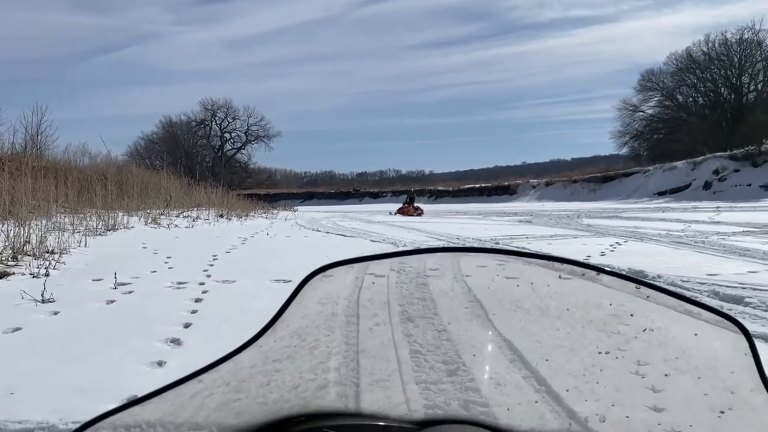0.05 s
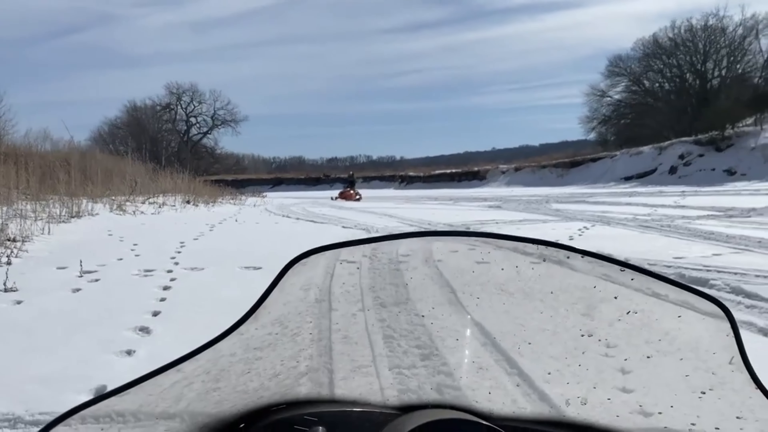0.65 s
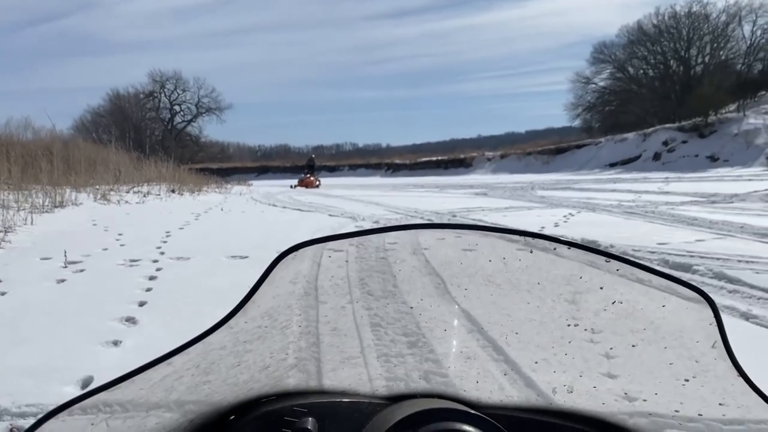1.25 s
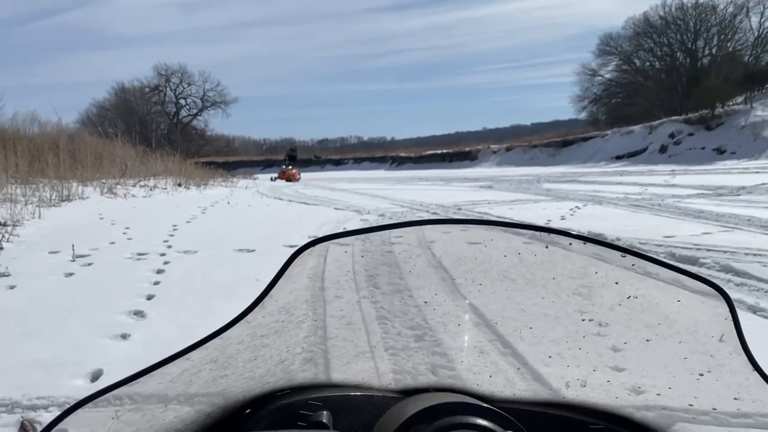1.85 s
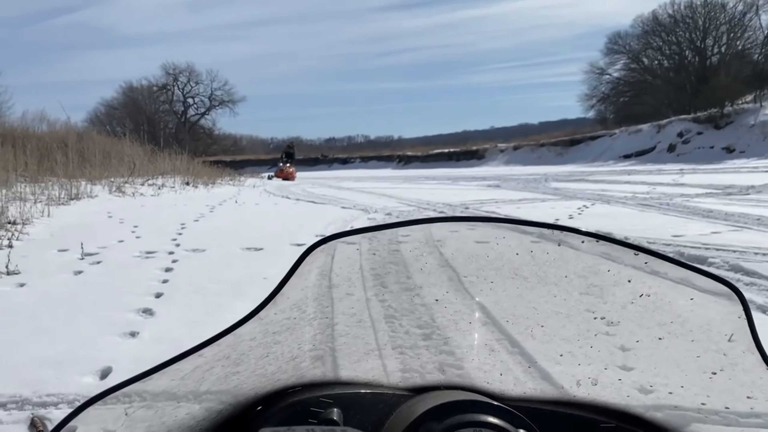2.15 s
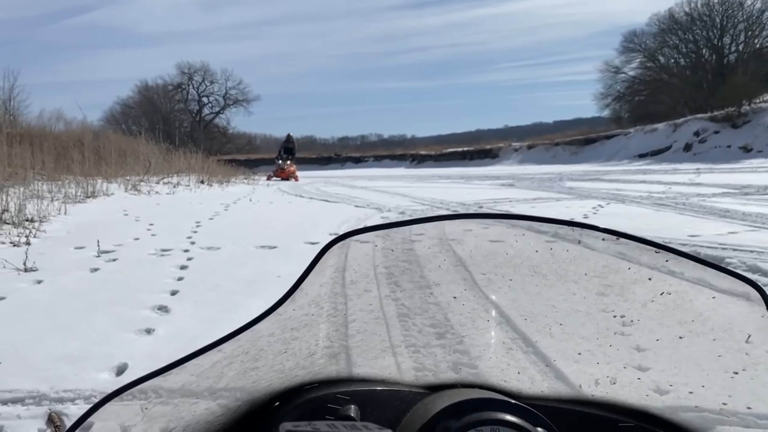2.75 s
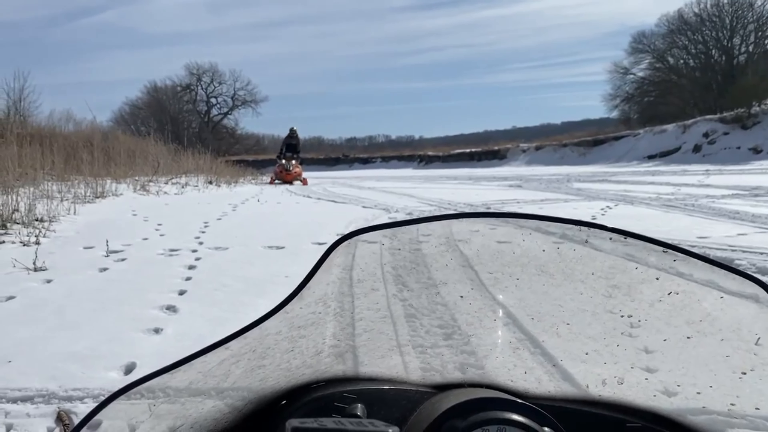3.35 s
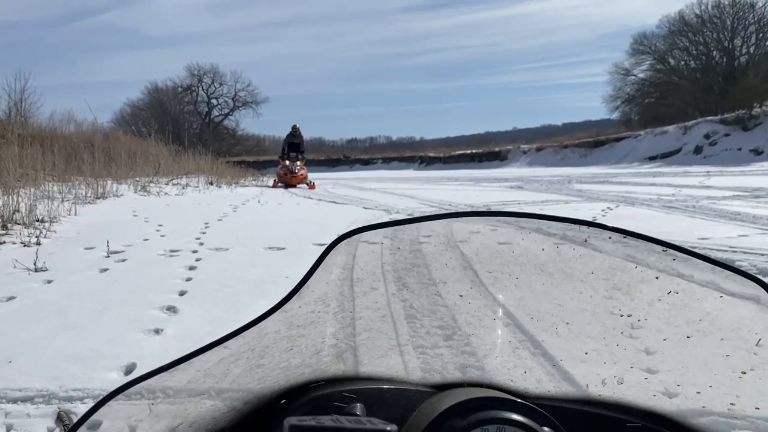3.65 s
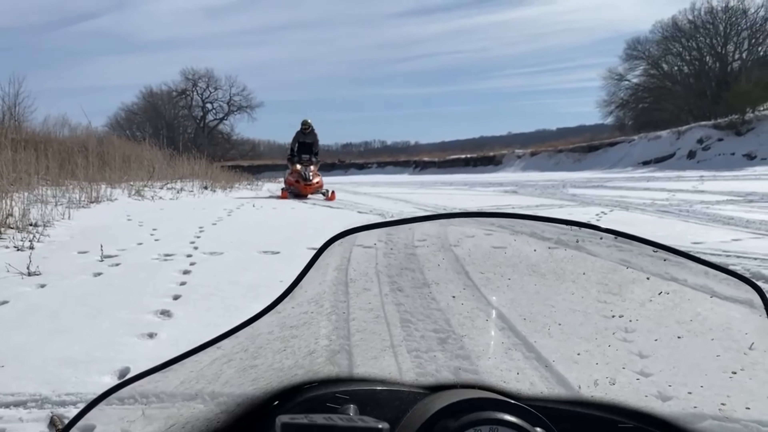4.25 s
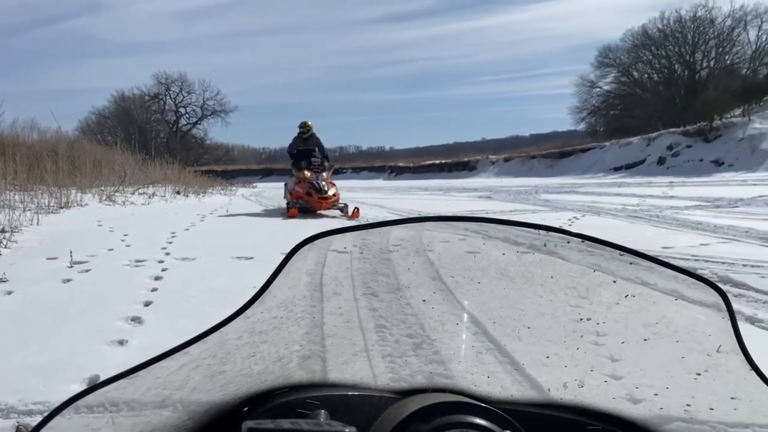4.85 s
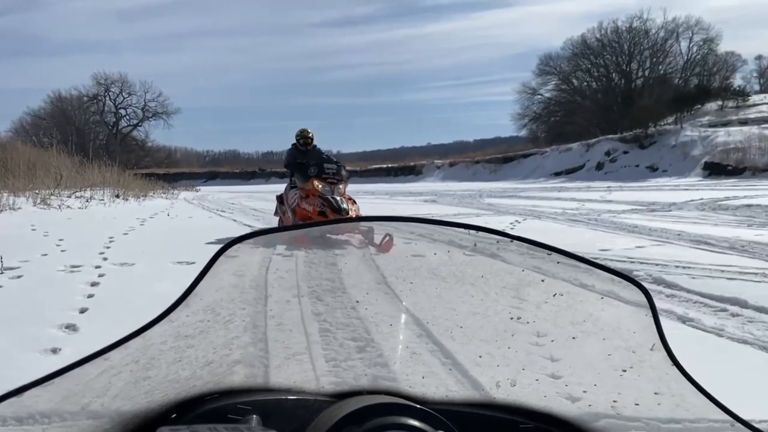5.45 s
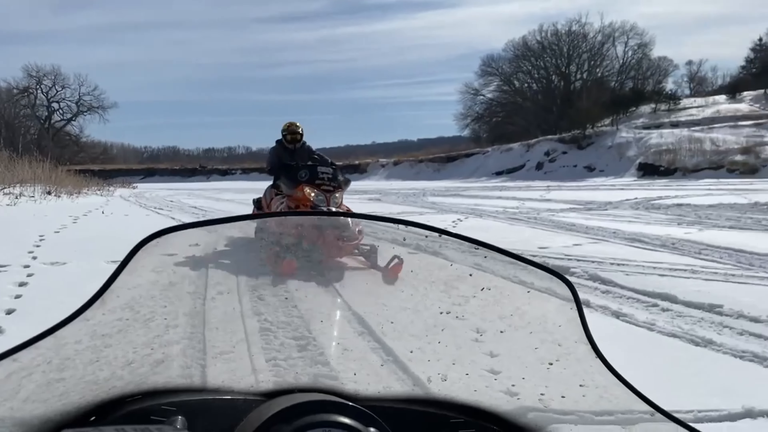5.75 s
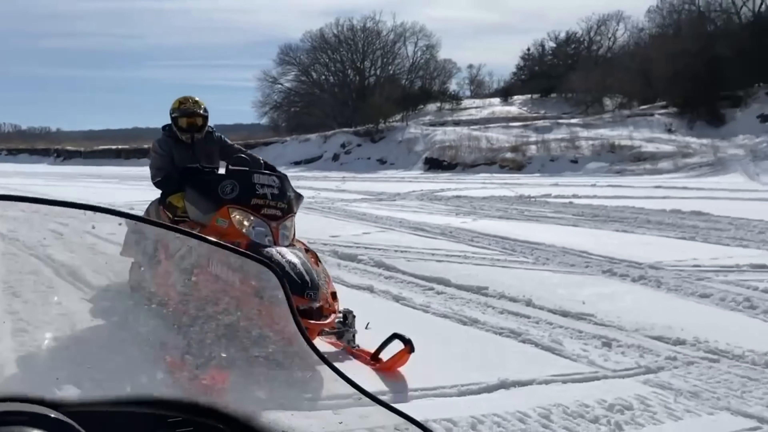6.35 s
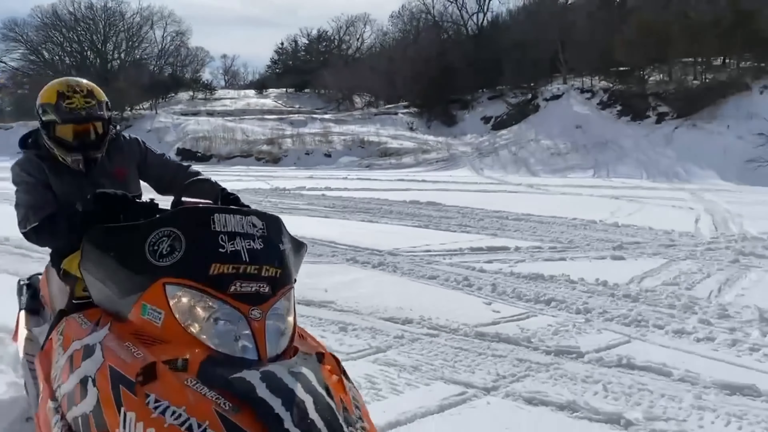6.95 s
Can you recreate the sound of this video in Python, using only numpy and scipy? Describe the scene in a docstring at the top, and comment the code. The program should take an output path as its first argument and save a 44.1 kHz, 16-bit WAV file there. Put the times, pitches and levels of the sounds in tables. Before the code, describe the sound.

A two-stroke snowmobile hums far off across open ice, its raspy note rising and falling in several swells of throttle. About halfway through, the revs sink and the exhaust breaks into rapid, uneven pops that grow loud as the machine comes up beside the microphone. Its track rattles and sprays snow, while light wind rumbles on the microphone and a few soft knocks sound nearby.

```python
"""Snowmobile on a frozen river

A two-stroke sled drives up the ice and slides in beside a parked one. Far off it hums and barks in
swells of throttle; then the throttle shuts, the revs sink and the charge burns only about every third
stroke, in volleys of pops that ring the exhaust and grow as it nears. The track rattles, squeals faintly
and sprays snow; a light wind and a few soft knocks reach the microphone."""
import sys
import numpy as np
from scipy import signal
from scipy.fft import rfft, irfft, next_fast_len
from scipy.io import wavfile
from scipy.ndimage import uniform_filter1d, minimum_filter1d

SR = 44100
rng = np.random.default_rng(int(sys.argv[2]) if len(sys.argv) > 2 else 0)


def pcm_store(signal):
    """Save signal as 16-bit PCM."""
    levels = np.round(np.clip(np.atleast_2d(signal), -1, 1) * 32767)
    wavfile.write(sys.argv[1], SR, levels.astype(np.int16).T)


N = 317079
TIME = np.arange(N) / SR

# Loud pops. Each row: time in seconds, strength in dB, strength of the next stroke's flare in dB.
LOUD_POPS = [(4.4536, -24.5, -34.5), (4.5405, -23, -29), (4.5664, -22, -35), (4.6107, -27.0, -25),
             (4.645, -23.5, -27.5), (4.725, -23.5, -27.5), (4.7485, -19, -34), (4.7771, -24, -28.5),
             (4.8127, -21.5, -42.5), (4.865, -21.5, -46), (4.8932, -17.5, -33.5), (4.918, -23, -24.5),
             (4.9727, -21, -23), (5.0169, -27.5, -17.5), (5.0624, -23, -33), (5.0885, -15, -18.5),
             (5.117, -20.5, -32.5), (5.143, -23.5, -30.5), (5.1795, -20, -27.5), (5.2054, -17.5, -21.5),
             (5.2796, -17, -18.5), (5.3156, -16.5, -25.5), (5.3422, -19.5, -25), (5.3733, -16, -31.5),
             (5.4003, -25.5, -17), (5.4271, -15, -24), (5.4556, -17.5, -14), (5.4861, -19.5, -23),
             (5.5115, -28.5, -12), (5.5415, -13.0, -18.5), (5.6065, -11, -16), (5.6347, -9.5, -22),
             (5.6644, -22.5, -16.5), (5.7009, -14, -9.5), (5.7389, -9.5, -9), (5.7878, -11, -12.5),
             (5.8154, -8, -6.5), (5.8433, -6.5, -9.5), (5.9085, -7.5, -11), (5.938, -5.5, -11),
             (5.985, -14, -16.5), (6.0129, -13.5, -7.5), (6.0402, -7, -7), (6.0795, -18, -16),
             (6.116, -14.5, -7.5), (6.1529, -12, -12), (6.1819, -7, -16), (6.2085, -7, -12.5),
             (6.2373, -7, -11.5), (6.2668, -6, -5), (6.3132, -9, -4), (6.3428, -5.5, -20),
             (6.3725, -8.5, -15), (6.4015, -15, -22), (6.4318, -2.5, -23.5), (6.461, -3.5, -12.5),
             (6.511, 3, -24), (6.5423, -1.5, -13), (6.5913, -1.5, -15), (6.6242, -7.5, -29),
             (6.6728, -7.5, -17.5), (6.7037, -7, -25.5), (6.735, 1, -27), (6.765, -11, -16.0),
             (6.8152, -8.5, -13.5), (6.8462, -5.5, -16.5), (6.8943, -11, -20.5), (6.9258, -11.5, -14.5),
             (6.9753, -12, -17), (7.0046, -18.5, -18.5), (7.0444, -9, -14), (7.0945, -14.5, -17),
             (7.123, -11.5, -13.5), (7.153, -8, -12), (7.1814, -12.5, -9.5)]
# Strokes that do not catch. Each row: time in seconds, strength in dB, puff in the pipe in dB.
MISFIRES = [(3.45, -76, -51), (3.6, -33, -25), (4.3, -35, -27.5), (4.8, -30.5, -16), (5.5, -26, -11.5),
            (5.9, -19, -11.5), (6.2, -22, -11), (6.5, -30, -5.5), (6.8, -31, -12), (7.19, -34.5, -8.5)]


def amp(db):
    """Decibels to gain."""
    return 10 ** (np.asarray(db) / 20)


def unit(x):
    """Scales to rms 1."""
    return x / np.sqrt(np.mean(x ** 2) + 1e-20)


def curves(rows, at=TIME):
    """Each column of a table, joined by straight lines in time."""
    seconds, *columns = np.transpose(rows)
    return [np.interp(at, seconds, column) for column in columns]


def wander(rate):
    """Smooth random drift of rms 1 that changes about rate times a second."""
    size = 4096
    hz = np.fft.rfftfreq(size, TIME[-1] / size)
    slow = irfft(rfft(rng.standard_normal(size)) * np.exp(-(hz / rate) ** 2))
    return unit(np.interp(TIME, np.linspace(0, TIME[-1], size), slow))


def colour(x, spectrum, modes=()):
    """Minimum-phase EQ from a spectrum and resonances; its impulse response peaks at 1."""
    size = 8192
    hz = np.fft.rfftfreq(size, 1 / SR)
    point_hz, point_db = np.transpose(spectrum)
    db = np.interp(np.log(hz + 1), np.log(point_hz), point_db)
    db = db + sum(lift / (1 + (2 * (hz - centre) / width) ** 2) for centre, width, lift in modes)
    log_gain = np.log(amp(np.r_[db, db[-2:0:-1]]))
    taps = np.fft.ifft(np.exp(np.conj(signal.hilbert(log_gain)))).real[:size // 2]
    return signal.oaconvolve(np.atleast_2d(x), taps[None] / abs(taps).max(), axes=1)[:, :N]


def clicks(times, sizes):
    """Impulses, each shared between its two nearest samples."""
    whole, part = np.divmod(np.clip(times * SR, 0, N), 1)
    whole = whole.astype(int)
    before = np.bincount(whole, sizes * (1 - part), N + 2)[:N]
    after = np.bincount(whole + 1, sizes * part, N + 2)[:N]
    return before + after


def fade(x, seconds):
    """Lets every impulse die away exponentially."""
    return signal.lfilter([1], [1, -np.exp(-1 / (seconds * SR))], x)


def noise(spread):
    """Stereo noise: a common middle plus sides scaled by spread."""
    mid, side = rng.standard_normal((2, N))
    return np.array([mid + spread * side, mid - spread * side])


def pan(x, left_db):
    """Leans a sound to the left, or to the right if negative."""
    return x * amp([[left_db / 2], [-left_db / 2]])


def wind(gust_db=3):
    """Wind on the microphone: a lumpy rumble in random gusts."""
    # Each row: time in seconds, level in dB.
    levels = [(0, -49), (.15, -41), (.3, -52), (.45, -57), (.57, -40), (.9, -45.5), (1.4, -38.5),
              (2.2, -34.5), (2.5, -27), (3.0, -34), (3.35, -33), (3.7, -26), (4.7, -18), (5.3, -24.5),
              (6.1, -20), (7.19, -23)]
    # Each row: frequency in Hz, gain in dB.
    rumble_eq = [(10, -18.5), (30, -28), (50, -6.5), (75, 0), (105, -1), (160, -0.5), (260, -23),
                 (600, -55.5), (2000, -74)]
    return unit(colour(noise(.2), rumble_eq)) * amp(curves(levels)[0] + gust_db * wander(25))


def knocks(width_hz=80, body_db=7):
    """Dull bumps near the microphone, each with one short resonance."""
    # Each row: time in seconds, level in dB, body note in Hz.
    bumps = [(0.096, -27, 132), (0.123, -29.5, 166), (0.23, -34.5, 134), (0.795, -22.5, 296),
             (0.822, -28, 118), (1.565, -35, 170), (1.667, -18.5, 310), (1.69, -23.5, 113),
             (4.22, -12, 344), (4.327, -11, 265), (4.442, -13, 270)]
    out = 0
    for start, db, hz in bumps:
        dull_eq = [(25, -14), (70, 0), (hz, -4), (2.16 * hz, -20), (4 * hz, -50)]
        out += colour(clicks(np.array([start]), amp([db])), dull_eq, [(hz, width_hz, body_db)])
    return out


def squeals(drift=0.009, flicker_db=3.5):
    """The far-off running gear squeals faintly in gliding, flickering tones."""
    # Each row: start and length in seconds, first and last pitch in Hz, level in dB.
    glides = [(0.15, 0.17, 2280, 2320, -60), (0.31, 0.55, 2335, 2320, -61.5),
              (0.228, 0.29, 1610, 1530, -58), (0.294, 0.3, 2860, 2830, -63), (1.2, 0.27, 2320, 2290, -62)]
    out = np.zeros(N)
    for start, length, start_hz, end_hz, db in glides:
        along = np.clip((TIME - start) / length, 0, 1)
        hz = (start_hz + (end_hz - start_hz) * along) * (1 + drift * wander(64))
        envelope = np.sqrt(abs(np.sin(np.pi * along))) * amp(db + flicker_db * wander(17))
        out += envelope * np.sin(2 * np.pi * np.cumsum(hz) / SR)
    return out


def bank_echoes(x, wet_db=-15, t60=0.071):
    """Weak scattered echoes from the ice, the parked sled and the river banks."""
    t = np.arange(SR // 2) / SR
    taps = rng.standard_normal((2, len(t))) * (rng.random((2, len(t))) < .05)
    taps *= (t > .003) * amp(-60 * t / t60)
    taps = signal.lfilter(*signal.butter(2, 200, "high", fs=SR), taps)
    taps /= np.linalg.norm(taps, axis=1, keepdims=True)
    return amp(wet_db) * signal.fftconvolve(x, taps, axes=1)[:, :N]


def ice_bounce(x, share=0.65, delay_s=0.006, sway_s=0.0007):
    """Adds a reflection whose path sways with the sled, so each overtone flutters on its own."""
    return x + share * np.interp(TIME - delay_s - sway_s * wander(12.1), TIME, x)


def pop_ticks(decay_s=0.0059):
    """Bright, gritty ticks ride on the nearest pops."""
    # Each row: time in seconds, level in dB.
    ticks = [(6.511, -27), (6.541, -46), (6.59, -31.5), (6.62, -32), (6.675, -44), (6.703, -37),
             (6.73, -29.5), (6.764, -35.5), (6.811, -36), (6.844, -33.5), (6.893, -36), (6.925, -35.5),
             (6.975, -36.5), (7.045, -35.5), (7.121, -32), (7.152, -33)]
    # Each row: frequency in Hz, gain in dB.
    tick_eq = [(1500, -26), (2400, -9), (3500, -15), (4600, -5), (6800, -8), (8200, -18), (10500, -6.5)]
    # Each row: centre and width in Hz, lift in dB.
    tick_peaks = [(4350, 290, 6.5), (5550, 260, 11.5), (6800, 350, 10.5), (9470, 410, 15.5)]
    times, db = np.transpose(ticks)
    return unit(colour(noise(0.21), tick_eq, tick_peaks)) * fade(clicks(times, amp(db)), decay_s)


def track(turns, strokes, strength_db, load, throb=0.024, grain_db=5.0, grains_per_s=1500):
    """The track rattles and throws snow, harder under load; strokes and pops shake the hiss."""
    # Levels before load is added. Each row: time in seconds, then rattle, spray and sizzle in dB.
    levels = [(0, -50.5, -64.5, -91), (.9, -43, -76.5, -77.5), (1.75, -43.5, -72.5, -71.5),
              (2.5, -39.5, -63.5, -65), (3.4, -41.5, -65, -66.5), (4.6, -38, -61.5, -64.5),
              (6.05, -37.5, -56, -63.5), (6.5, -35, -46.5, -49), (6.95, -33.5, -49, -55.5),
              (7.19, -26.5, -50, -51.5)]
    # Flares of sizzle at the hardest squeezes. Each row: time in seconds, lift in dB.
    flares = [(1.87, 12), (2.13, 10.5), (2.3, 14.5), (3.17, 17.5)]
    # Tone of the three layers. Each row: frequency in Hz, gain in dB.
    rattle_eq = [(100, 17.5), (300, 3), (700, 7), (1100, 0), (1420, 9.5), (1800, -2.5), (2700, -2.5),
                 (3400, -9.5), (4200, -11.5), (5200, -15), (8000, -29.5)]
    spray_eq = [(2000, -21.5), (3600, -1.5), (5000, -4), (7200, 1), (8200, -14), (11000, -10)]
    sizzle_eq = [(6000, -32), (8400, -21.5), (9200, -1.5), (10700, -3), (11500, -28.5)]
    rattle_db, spray_db, sizzle_db = curves(levels)
    flare_db = sum(db * np.exp(-np.square((TIME - peak) / 0.058)) for peak, db in flares)
    jolts = fade(clicks(strokes, amp(strength_db)), seconds=0.006)

    def shake(depth):
        swing = (1 + throb * np.cos(2 * np.pi * turns)) * (1 + depth * jolts)
        return swing / np.sqrt(uniform_filter1d(swing ** 2, size=6000))

    grains = (rng.random(N) < grains_per_s / SR) * amp(grain_db * np.minimum(rng.exponential(1, N), 5))
    snow = unit(noise(0.5)) + 0.36 * unit(grains * rng.choice([-1, 1], N))
    rattle = unit(colour(noise(.55) * shake(0.93), rattle_eq))
    rattle *= amp(rattle_db + 7 * load + 1.37 * wander(17))
    spray = unit(colour(snow * shake(5), spray_eq))
    spray *= amp(spray_db + 7.5 * load + 2.34 * wander(38))
    sizzle = unit(colour(noise(0.33) * shake(5), sizzle_eq))
    sizzle *= amp(sizzle_db + 4 * load + flare_db + 2.0 * wander(35))
    return pan(rattle + spray, left_db=0.7) + pan(sizzle, left_db=-0.5)


def vents(strokes, strength_db, scatter_db=2, follow=0.9, breath_db=-22, puff_s=0.0082):
    """A close-up growl: each stroke knocks the hood and sends a rough puff through its vents."""
    # Each row: time in seconds, level in dB.
    levels = [(5.6, -80), (6.2, -39), (6.5, -31), (6.8, -25.5), (7.0, -21.5), (7.19, -23.5)]
    # Each row: frequency in Hz, gain in dB.
    growl_eq = [(150, -43.5), (280, 0), (400, 1.5), (620, -4), (850, -15), (1200, -27), (2000, -50)]
    # The hood's hollow notes. Each row: centre and width in Hz, lift in dB.
    hood_modes = [(422, 10, 2), (664, 36, 12.5), (855, 50, 5.5)]
    knock_db = scatter_db * rng.standard_normal(len(strokes)) + follow * np.maximum(strength_db, -30)
    knock = clicks(strokes, amp(knock_db))
    puffs = fade(knock, puff_s) * noise(0.4) * amp(breath_db)
    growl = unit(colour(knock + puffs, growl_eq, hood_modes))
    return pan(growl * amp(curves(levels)[0]), left_db=-0.5)


def throttle(sag_share=.74):
    """Load on the engine, about 0-1: each squeeze swells, then sags a little faster."""
    # Each row: peak time and rise in seconds, load from 0 to 1.
    squeezes = [(0.71, 0.12, 0.73), (1.32, 0.095, 0.44), (1.61, 0.069, 0.72), (1.87, 0.12, 0.84),
                (2.17, 0.21, 0.82), (3.17, 0.16, 1.0)]
    return sum(load * np.exp(-np.square((TIME - peak) / np.where(TIME < peak, rise, rise * sag_share)))
               for peak, rise, load in squeezes)


def crank(flutter=0.0018, pop_rise_s=0.001013):
    """Turns counted over time, one stroke each; the flywheel keeps them smooth."""
    # Revs under throttle, then running down. Each row: time in seconds, strokes per second.
    pulling = [(0.1, 123.2), (0.19, 120.6), (0.34, 122.5), (0.38, 126.0), (0.53, 122.7), (0.71, 149.9),
               (0.77, 150.9), (0.85, 141.7), (0.96, 135.8), (1.18, 137.6), (1.37, 145.6), (1.46, 139.5),
               (1.63, 153.5), (1.75, 144.3), (1.91, 163.6), (2.05, 151.8), (2.22, 166.7), (2.4, 152.0),
               (2.75, 140.1), (2.95, 144.7), (3.19, 161.8), (3.3, 156.6), (3.37, 143.6), (3.5, 137.0)]
    slowing = [(3.62, 131), (3.99, 122.7), (4.3, 117.5), (4.55, 115.5), (4.8, 112.5), (5.1, 111.7),
               (5.35, 107.6), (5.6, 105.6), (5.85, 105.7), (6.15, 107.5), (6.35, 103.1), (6.55, 98.1),
               (6.75, 98.7), (6.95, 100.4), (7.19, 103.3)]
    speed_hz = uniform_filter1d(curves(list(pulling) + slowing)[0], size=1500)
    turns = np.cumsum(speed_hz * (1 + flutter * wander(23.7))) / SR
    # Ease the phase so that the loud pops fall on whole strokes.
    onsets = np.transpose(LOUD_POPS)[0] - pop_rise_s
    slip = np.unwrap(np.interp(onsets, TIME, turns) % 1, period=1)
    return turns - uniform_filter1d(np.interp(TIME, onsets, slip), size=6000)


def hum(turns, strokes, load, rough=.14, jitter_s=3e-5, rasp_db=-30, rasp_s=0.0015):
    """A clean fundamental and a raspy pulse per stroke: barks under load, whirrs when coasting."""
    # Even firing before load is added. Each row: time in seconds, then fundamental, bark and nasal in dB.
    firing_levels = [(0, -42, -55.5, -61), (.4, -42.5, -57, -69), (.86, -38, -54, -54),
                     (.98, -31, -45.5, -52.5), (1.3, -25, -47.5, -55.5), (1.7, -28, -47.5, -53.5),
                     (2.4, -24, -44, -49.5), (2.9, -18.5, -38.5, -57.5), (3.23, -20.5, -40.5, -46),
                     (3.3, -30, -44, -57), (3.62, -18.5, -46, -64), (4.5, -23, -43, -68),
                     (5.2, -25.5, -88.5, -96.5)]
    # Throttle shut. Each row: time in seconds, then whirr, second and third harmonic in dB.
    coasting_levels = [(3.3, -78, -72, -75), (3.55, -48.5, -64, -55.5), (4.1, -44, -27.5, -41),
                       (4.55, -76, -27.5, -68), (5.1, -60.5, -33.5, -38.5), (5.5, -49.5, -33, -25.5),
                       (6.2, -35, -39, -25.5), (6.9, -44.5, -41, -26)]
    # Tone of the pulses. Each row: frequency in Hz, gain in dB.
    bark_eq = [(150, -40.5), (230, -3.5), (298, 8), (332, -14), (372, 7), (475, 7.5), (560, 1.5), (640, -7),
               (800, -8.5), (950, -10), (1080, -13), (1250, -8.5), (1430, -16), (1600, -17), (1800, -23),
               (2600, -22.5), (4200, -34), (8000, -69)]
    nasal_eq = [(900, -54), (1250, -7), (1365, 1), (1440, 6), (1520, -7), (1700, -21), (2200, -54)]
    whirr_eq = [(90, -27.5), (230, -4), (290, -14.5), (380, -12.5), (600, -3.5), (760, 2.5), (900, -7.5),
                (1100, -48.5), (1400, 2), (1750, -10), (2700, -34), (6000, -40)]
    fundamental_db, bark_db, nasal_db = curves(firing_levels)
    whirr_db, second_db, third_db = curves(coasting_levels)
    size, late = rng.standard_normal((len(strokes), 2)).T
    pulses = clicks(strokes + jitter_s * late, 1 + rough * size)
    rasp = fade(pulses, rasp_s) * noise(.3) * amp(rasp_db)
    bark = unit(colour(ice_bounce(pulses) + rasp, bark_eq))
    bark *= amp(bark_db + 7.5 * load + 1.8 * wander(15))
    nasal = unit(colour(ice_bounce(pulses) + rasp, nasal_eq))
    nasal *= amp(nasal_db + 6 * load + 1.8 * wander(7.5))
    whirr = unit(colour(pulses + rasp, whirr_eq)) * amp(whirr_db + 2 * wander(20))
    fundamental = np.cos(2 * np.pi * turns) * amp(fundamental_db + 3 * load + .5 * wander(12))
    drone = sum(np.cos(2 * np.pi * harmonic * (turns + .5)) * amp(db + 2.5 * wander(30))
                for harmonic, db in [(2, second_db), (3, third_db)])
    return pan(fundamental + drone, left_db=-0.5) + pan(bark + nasal + whirr, left_db=3.0)


def firings(strokes, strokes_per_pop=3, scatter_db=3.0, afterburn_db=-8):
    """Throttle shut: the charge builds for about three strokes, burns with a pop and flares once more."""
    # Small pops ahead of the volleys. Each row: time in seconds, strength in dB.
    stutter = [(3.45, -66), (3.6, -37), (3.95, -41.5), (4.3, -36), (4.45, -30.5)]
    count = len(strokes)
    pop_times, pop_db, flare_db = np.transpose(LOUD_POPS)
    pops = np.array([np.argmin(abs(strokes - time)) for time in pop_times])
    waits = strokes_per_pop + rng.choice([-1, 0, 1], count, p=[.04, .88, .08])
    burns = np.isin(pops[0] - np.arange(count), np.cumsum(waits))  # counted back from the first loud pop
    strength_db = np.where(burns, curves(stutter, strokes)[0], curves(MISFIRES, strokes)[0])
    strength_db += scatter_db * rng.standard_normal(count)
    previous_db = np.r_[strength_db[0], strength_db[:-1]]
    strength_db = np.maximum(strength_db, previous_db + afterburn_db)
    strength_db[np.minimum(pops + 1, count - 1)] = flare_db
    strength_db[pops] = pop_db
    burns[pops] = True
    return strength_db, burns


def puff(hz=212, rise_s=0.0038, decay_s=0.0076):
    """The pipe's soft note after a stroke that does not burn."""
    t = np.arange(SR // 16) / SR
    return -np.sin(2 * np.pi * hz * t) * (1 - np.exp(-t / rise_s)) * np.exp(-t / decay_s)


def whoop(start_hz=307, end_hz=142, sag_s=0.0038, rise_s=0.0012, hold_s=0.017):
    """The pipe's note after one burn: it sags as the gas drains and stops within a few cycles."""
    t = np.arange(SR // 20) / SR
    hz = end_hz + (start_hz - end_hz) * np.exp(-t / sag_s)
    envelope = (1 - np.exp(-t / rise_s)) * np.exp(-(t / hold_s) ** 4)
    return -np.sin(2 * np.pi * np.cumsum(hz) / SR) * envelope


def exhaust(strokes, strength_db, burns, whoop_db=-0.58, ring_db=-3.5, crack_db=-1.5, gas_db=-25,
            puff_scatter_db=3.0, whoop_lag_s=.002, puff_lag_s=.001):
    """Burns whoop in the pipe, unburnt strokes only puff; both ring the silencer, and hard burns crack."""
    # Tone of a pop's three parts. Each row: frequency in Hz, gain in dB.
    boom_eq = [(25, -7), (70, 16.5), (110, -2), (170, 4.5), (230, 3.5), (310, 1), (450, 0)]
    ring_eq = [(150, -9.5), (330, 10), (560, -2.5), (850, 5.5), (1120, -4.5), (1400, 4.5), (1580, -5),
               (1760, -28.5), (2500, -18), (3400, -34), (8000, -99)]
    crack_eq = [(120, 5.5), (300, -3), (450, 5.5), (700, 3.5), (880, 10.5), (1050, 9.5), (1300, 3.5),
                (1480, 0), (1750, -62.5), (3000, -51.5), (8000, -63)]
    # Resonances of the silencer and hood. Each row: centre and width in Hz, lift in dB.
    silencer_modes = [(410, 50, 4), (690, 50, 4), (815, 50, 9), (955, 55, 7), (1315, 70, 6)]
    gate = np.clip((strength_db + 42.0) / 12, 0, 1)  # the weakest burns raise no whoop
    whoop_sizes = burns * gate * amp(whoop_db + 0.48 * strength_db)
    puff_db = curves(MISFIRES, strokes)[1] + puff_scatter_db * rng.standard_normal(len(strokes))
    whoops = signal.oaconvolve(clicks(strokes + whoop_lag_s, whoop_sizes), whoop())[:N]
    puffs = signal.oaconvolve(clicks(strokes + puff_lag_s, ~burns * amp(puff_db)), puff())[:N]
    blows = clicks(strokes, amp(ring_db + 0.79 * strength_db))
    gas = fade(blows, seconds=0.005) * noise(0.2) * amp(gas_db)  # turbulence trails each blow
    boom = colour(whoops + puffs, boom_eq)
    ring = colour(blows + gas, ring_eq, silencer_modes)
    crack = colour(clicks(strokes, burns * amp(crack_db + 2.07 * strength_db)), crack_eq)
    return pan(boom, left_db=-.8) + pan(ring + crack, left_db=2.6)


def scene():
    """The throttle sets the load; one crank drives the hum, the pops and the track."""
    load = throttle()
    turns = crank()
    strokes = np.interp(np.arange(np.ceil(turns[0]), turns[-1]), turns, TIME)  # time of each whole turn
    strength_db, burns = firings(strokes)
    engine = hum(turns, strokes, load) + exhaust(strokes, strength_db, burns)
    engine += vents(strokes, strength_db)
    sled = engine + bank_echoes(engine) + track(turns, strokes, strength_db, load)
    return sled + pop_ticks() + squeals() + wind() + knocks()


def record(dry, ceiling=.96, cutoff_hz=11400):
    """Sound reaches the right microphone port just after the left; a limiter and a low-pass follow."""
    # Each row: frequency in Hz, phase lead of the left port in radians.
    port_lead = [(0, 0), (150, 0), (600, 0.39), (1300, 0.59), (2600, 0.24), (5500, 1.28), (10000, 1.5)]
    size = next_fast_len(N + SR // 10, True)
    lead = np.interp(np.fft.rfftfreq(size, 1 / SR), *np.transpose(port_lead))
    right = irfft(rfft(dry[1], size) * np.exp(-1j * lead), size)[:N]
    stereo = np.array([dry[0], right])
    safe_gain = np.minimum(1, ceiling / (abs(stereo).max(axis=0) + 1e-9))
    held_gain = minimum_filter1d(safe_gain, size=300)
    gain = uniform_filter1d(uniform_filter1d(held_gain, size=150), size=150)
    low_pass = signal.firwin(255, cutoff_hz, window=("kaiser", 9), fs=SR)
    return signal.oaconvolve(stereo * gain, low_pass[None], "same")


dry = scene()
out = record(dry)
pcm_store(out)
```